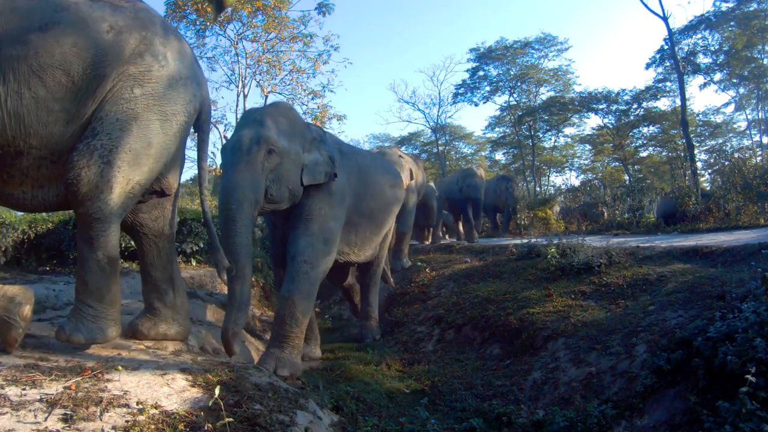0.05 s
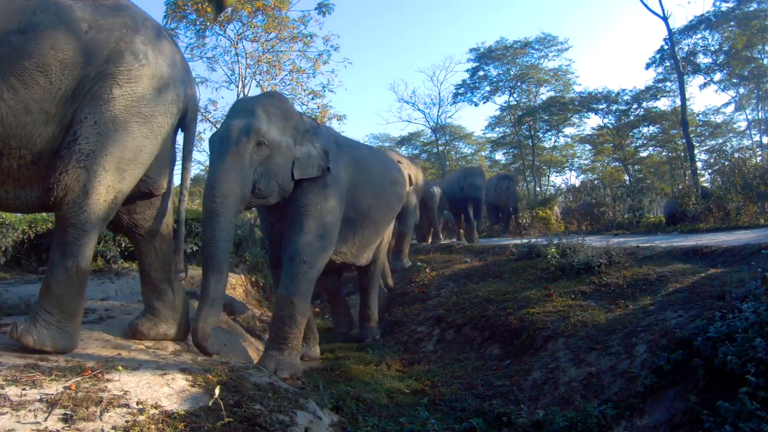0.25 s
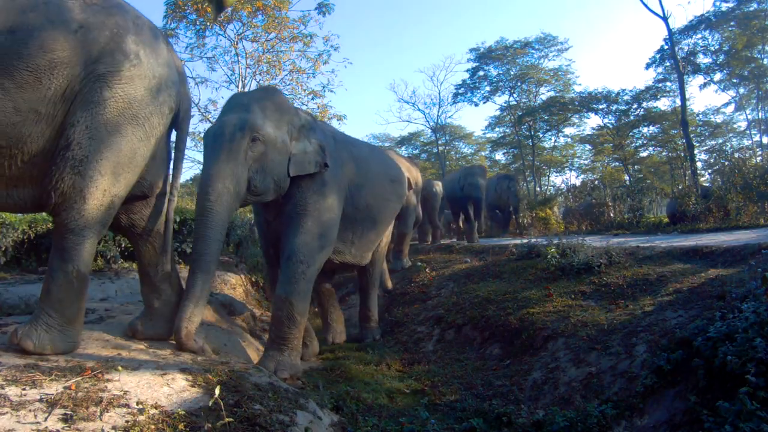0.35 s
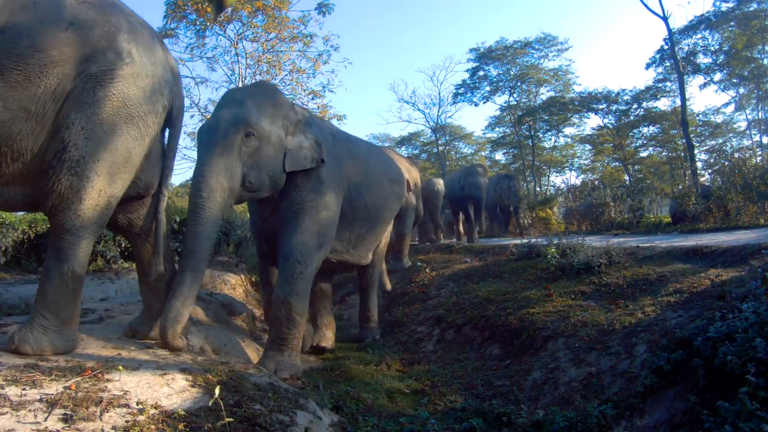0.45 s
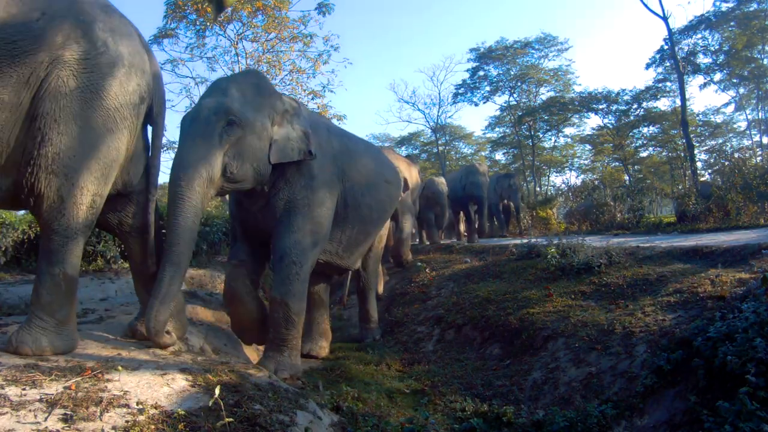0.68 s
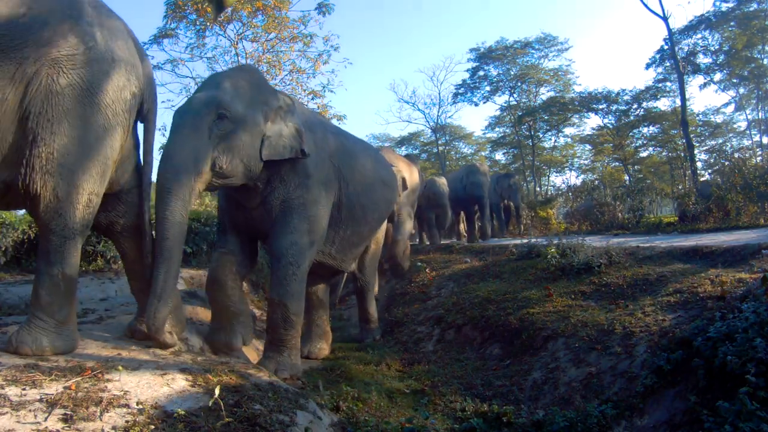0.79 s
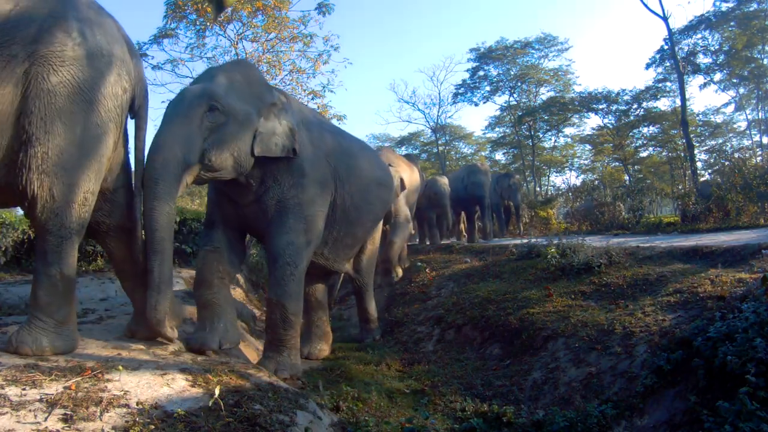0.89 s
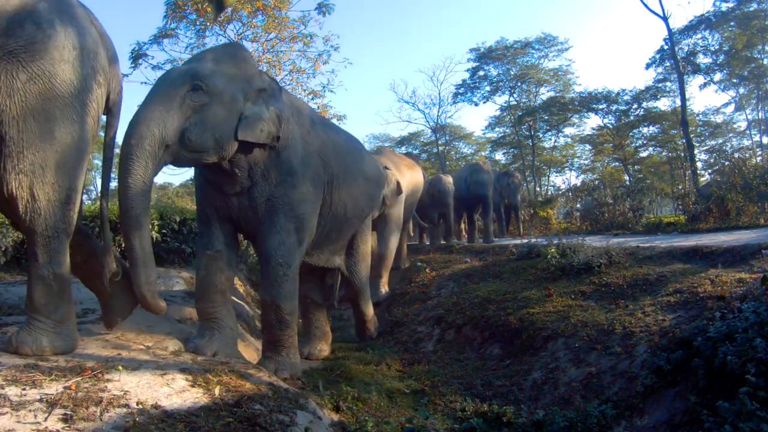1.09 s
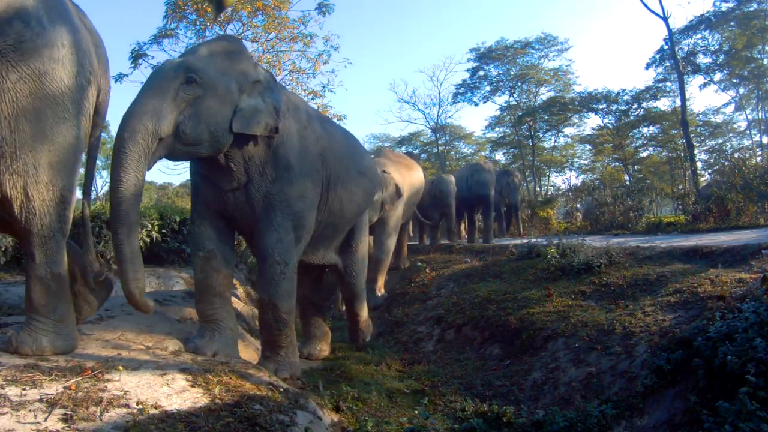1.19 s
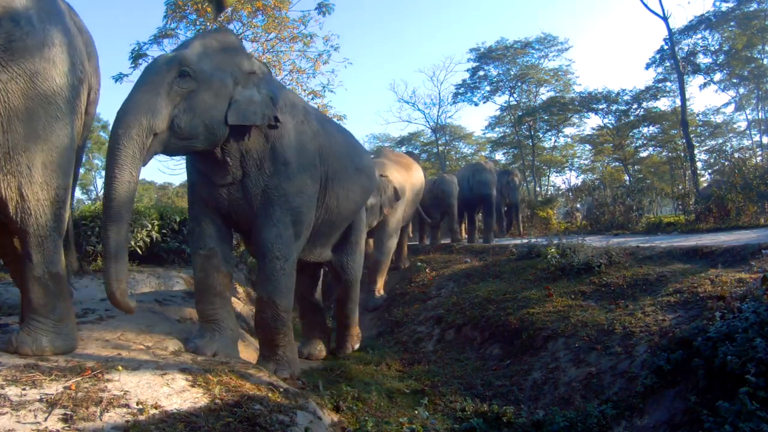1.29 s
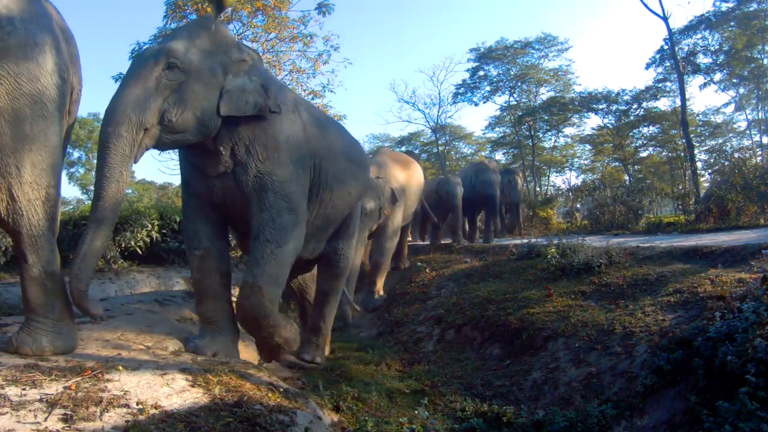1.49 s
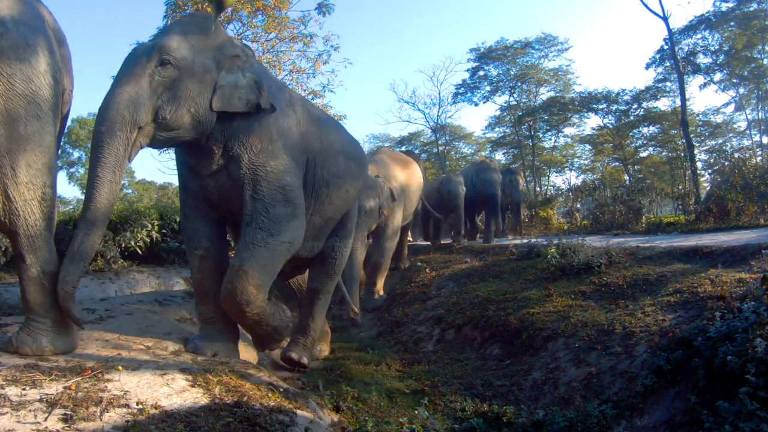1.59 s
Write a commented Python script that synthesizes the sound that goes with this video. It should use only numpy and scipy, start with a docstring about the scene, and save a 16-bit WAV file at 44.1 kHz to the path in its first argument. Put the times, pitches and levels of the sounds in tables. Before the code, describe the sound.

One brief, raspy elephant roar outdoors, followed by soft footsteps over a light rustle.

```python
"""Outdoors, a scuff and a soft footfall lead into one short, rough elephant roar, close by.
Its slow vocal folds drop to some 50 flaps a second and chop a turbulent rasp over a chest rumble.
A higher hoot breaks through in the middle and again at the end, where the folds catch in hard flaps.
Afterwards the herd shuffles over dry ground, a faint short hoot follows and a twig snaps.
A steady bed of rustle lies under it all."""
import sys
import numpy as np
from scipy import signal
from scipy.fft import rfft, irfft
from scipy.io import wavfile

SR = 44100
rng = np.random.default_rng(int(sys.argv[2]) if len(sys.argv) > 2 else 0)


def pcm_store(signal):
    """Save signal as 16-bit PCM."""
    levels = np.round(np.clip(np.atleast_2d(signal), -1, 1) * 32767)
    wavfile.write(sys.argv[1], SR, levels.astype(np.int16).T)


N = 72765
T = np.arange(N) / SR
FLUTTER_HZ = 59.1  # how fast the roar's pitch and level waver

# flap rate of the vocal folds: t/s, f/Hz
FOLD_RATE = [(0.15, 165.5), (0.2, 79.32), (0.28, 59.44), (0.35, 49.33), (0.45, 39.27), (0.56, 40.64),
             (0.64, 51.77), (0.72, 43.47), (0.84, 36.5)]
def roar(jitter=0.008):
    """The lead sound: slow folds pulse chest, rasp, hiss and hoot; flaps and rings sit on top."""
    voiced = T > FOLD_RATE[0][0]
    turns = np.cumsum(curve(FOLD_RATE) * (1 + jitter * wander(FLUTTER_HZ)) * voiced) / SR
    return chest(turns, voiced) + rasp(turns) + hiss(turns) + hard_flaps() + rings() + hoot(turns)


# envelope of the chest tone: t/s, level/dB
CHEST_LEVEL = [(.15, -67), (.172, -51), (.215, -42), (.28, -33.5), (.335, -31.5), (.38, -39.5), (.46, -42),
               (.65, -41), (.71, -52), (.76, -64), (.81, -76)]
# its harmonics, fundamental first: level/dB
CHEST_HARMONICS = [-5, 0.5, -15]
def chest(turns, voiced, shimmer_db=1):
    """The low end: a clean tone from the folds' first three harmonics."""
    tone = -sum(amp(db + shimmer_db * wander(FLUTTER_HZ)) * np.cos(2 * np.pi * k * turns)
                for k, db in enumerate(CHEST_HARMONICS, 1))
    return level(CHEST_LEVEL) * unit(tone * voiced)


# formants of throat, opening throat, mouth and bright edge: f/Hz, width/Hz, level/dB
THROAT_FORMANTS = [(159, 128, -3.5), (258, 160, -1.5), (373.4, 141, -1)]
OPENING_FORMANTS = [(460, 140, -1.5), (640, 237, 1)]
MOUTH_FORMANTS = [(686, 280, -12), (876, 220, 5), (1109, 260, 1)]
EDGE_FORMANTS = [(1583, 248, 1.5), (1904, 157, -4.5), (2292, 354, 1.5), (2894, 440, -11)]
# envelopes of the same four bands: t/s, level/dB
THROAT_LEVEL = [(.135, -77), (.165, -42), (.225, -31), (.335, -28), (.43, -32.5), (.51, -30.5),
                (.573, -37.5), (.61, -37.5), (.725, -36), (.76, -49.5), (.83, -76)]
OPENING_LEVEL = [(.155, -59), (.2, -39.5), (.3, -34), (.39, -37), (.43, -38.5), (.51, -37.5), (.6, -47)]
MOUTH_LEVEL = [(.16, -73), (.21, -53), (.26, -36), (.37, -31), (.42, -34), (.55, -37), (.65, -46.5),
               (.69, -51), (.735, -42.5), (.765, -49), (.82, -68)]
EDGE_LEVEL = [(.18, -56), (.235, -38), (.35, -37), (.405, -38), (.425, -42.5), (.5, -37), (.61, -41.5),
              (.7, -56), (.76, -57)]
def rasp(turns):
    """The body of the roar: chopped air resonates in throat and mouth."""
    throat_flow = airflow(turns, slap_db=-5, noise_db=-10)
    rough_flow = airflow(turns, slap_db=-1, noise_db=-7)
    throat = level(THROAT_LEVEL) * steady(tract(throat_flow, THROAT_FORMANTS), 0.05)
    opening = level(OPENING_LEVEL) * steady(tract(rough_flow, OPENING_FORMANTS), 0.04)
    mouth = level(MOUTH_LEVEL) * steady(tract(rough_flow, MOUTH_FORMANTS), 0.055)
    edge = level(EDGE_LEVEL) * steady(tract(rough_flow, EDGE_FORMANTS), 0.031)
    return throat + opening + mouth + edge


def airflow(turns, slap_db, noise_db, slaps_per_s=420, puff_cycles=0.96, leak=0.98, shimmer_db=2):
    """One rattling closure per cycle, with a puff of turbulence and irregular soft-tissue slaps."""
    closures = np.diff(np.floor(turns), prepend=np.floor(turns[0])) * amp(shimmer_db * noise())
    tissue_tail = noise() * burst(0, rise=0.0025, decay=0.012)  # the same after each closure
    rattle = signal.fftconvolve(closures, tissue_tail)[:N]
    puffs = leak + np.exp(-(turns % 1) / puff_cycles)  # air also leaks between puffs
    slaps = (rng.random(N) < slaps_per_s / SR) * amp(np.minimum(rng.exponential(1, N), 2))
    return unit(rattle) + amp(slap_db) * unit(slaps) + amp(noise_db) * unit(puffs * noise())


def tract(flow, formants):
    """The vocal tract as parallel resonances of alternating polarity."""
    return unit(sum((-1) ** k * amp(db) * band(flow, hz, width)
                    for k, (hz, width, db) in enumerate(formants)))


# pitch line of the hoot: t/s, f/Hz
HOOT_PITCH = [(.33, 344), (.36, 321), (.405, 316.5), (.47, 247.5), (.55, 248.5), (.6, 290.5), (.655, 284),
              (.674, 386), (.715, 381), (.76, 350.5), (.82, 348)]
# its envelope: t/s, level/dB
HOOT_LEVEL = [(.328, -42), (.353, -19), (.402, -21.5), (.418, -46), (.5, -33), (.55, -29.5), (.573, -49),
              (.601, -29), (.645, -31.5), (.66, -35), (.71, -31.5), (.78, -40.5), (.83, -59)]
def hoot(turns, wobble=0.0175, chop=0.28, harmonics_db=(0, -17, -18)):
    """A second, faster oscillator cuts through the roar, shaken by the slow folds."""
    hz = curve(HOOT_PITCH) * (1 + wobble * wander(FLUTTER_HZ))
    phase = 2 * np.pi * np.cumsum(hz) / SR
    tone = sum(amp(db) * np.sin(k * phase) for k, db in enumerate(harmonics_db, 1))
    return level(HOOT_LEVEL) * unit(tone * (1 + chop * np.cos(2 * np.pi * turns)))


# hits of the folds: t/s, throat level/dB, mouth level/dB, edge level/dB
FLAP_HITS = [(.600, -28.5, -53, -52), (.619, -36.5, -32, -29.5), (0.637, -30, -45, -40),
             (.659, -38, -35, -44.5), (.680, -29.5, -33, -47), (.701, -30, -34.5, -55)]
# formants of their bright edge: f/Hz, width/Hz, level/dB
FLAP_EDGE = [(1688, 180, -0.52), (2360, 240, -1.8)]
def hard_flaps(throat=(258, 142, 0), mouth=(915, 300, 0)):
    """Single hard flaps as the roar slows, each a puff into throat, mouth and bright edge."""
    layers = [sum(amp(db) * steady(band(noise(), hz, width), 0.012) for hz, width, db in formants)
              for formants in ([throat], [mouth], FLAP_EDGE)]
    return sum(amp(db) * burst(start, rise=0.0037, decay=0.0043, hold=0.005) * layer
               for start, *levels in FLAP_HITS for db, layer in zip(levels, layers))


# resonances that sing out in the roar: t/s, length/s, start f/Hz, end f/Hz, level/dB
RING_CUES = [(.285, .15, 168, 174, -30.5), (.225, 0.14, 1860, 1890, -41), (.33, 0.136, 800, 925, -39.5),
             (.54, 0.127, 1085, 1055, -38), (.34, 0.11, 578, 570, -42), (.22, 0.111, 358, 380, -34.5),
             (0.657, .1, 1030, 1030, -42.5), (.66, .085, 792, 792, -40), (.66, 0.078, 885, 885, -39),
             (0.651, 0.089, 1630, 1630, -49.5), (0.326, 0.096, 2380, 2410, -42.5)]
def rings(fuzz_hz=21.4):
    """Narrow, fuzzy resonances swell, glide and fade."""
    out = np.zeros(N)
    for start, length, hz_from, hz_to, db in RING_CUES:
        progress = np.clip((T - start) / length, 0, 1)
        phase = 2 * np.pi * np.cumsum(hz_from + (hz_to - hz_from) * progress) / SR
        fuzz = wander(fuzz_hz) * np.cos(phase) + wander(fuzz_hz) * np.sin(phase)
        swell = np.sqrt(4 * progress * (1 - progress))
        out += amp(db) * swell * steady(fuzz, 0.045)
    return out


# envelope of the breath: t/s, level/dB
HISS_LEVEL = [(.16, -65.5), (.205, -50.5), (.345, -43.5), (.43, -49), (.59, -47.5), (.67, -54), (.83, -60),
              (.87, -62)]
# its EQ: f/Hz, level/dB
HISS_EQ = [(1500, -40), (3200, -8.5), (4100, 4), (4900, -8), (6000, -5.5), (9000, -10), (11000, -19.5),
           (15500, -20.5)]
def hiss(turns, chop=0.15, flicker_db=1, climax_s=0.344):
    """Air rushes from the mouth, lightly pumped by the folds, with a bright spurt at the climax."""
    air = noise() * (1 + chop * np.sin(2 * np.pi * turns)) * amp(flicker_db * wander(230))
    spurt = unit(band(noise(), hz=5560, width=1500)) * np.exp(-((T - climax_s) / 0.044) ** 2)
    return level(HISS_LEVEL) * colour(air, HISS_EQ) + amp(-49.5) * spurt


def faint_hoot(start=1.12, pitch_hz=271.3, scoop=0.1525, scoop_s=0.026, fade_s=0.11):
    """A soft, short call scoops up to its pitch and fades."""
    age = np.maximum(T - start, 0)
    hz = pitch_hz * (1 - scoop * np.exp(-(age / scoop_s) ** 2) + 0.018 * wander(39))
    envelope = np.minimum(age / 0.012, 1) * np.exp(-(age / fade_s) ** 2)
    return amp(-46.5) * envelope * unit(np.sin(2 * np.pi * np.cumsum(hz) / SR))


# soft steps: t/s, level/dB, f/Hz, decay/s
STEP_CUES = [(0.078, -40.5, 530, 0.0043), (.896, -47.5, 218, 0.0055), (.975, -54, 163, 0.021),
             (1.021, -48, 820, 0.0053), (1.04, -59, 200, 0.0075), (1.199, -49.5, 700, 0.019),
             (1.465, -55.5, 257, 0.028), (1.501, -53, 515, 0.018)]
def footfalls():
    """Padded feet land in dull thuds."""
    return sum(amp(db) * burst(start, 0.0047, decay) * steady(band(noise(), hz, 0.55 * hz), 0.027)
               for start, db, hz, decay in STEP_CUES)


# foot scrapes: t/s, level/dB, decay/s
SCUFF_CUES = [(0.0, -45, 0.024), (0.112, -49, 0.024), (1.42, -54.5, 0.1)]
# EQ of the grit: f/Hz, level/dB
GRIT_EQ = [(200, -40.5), (900, 4.5), (1500, -4), (2300, 1), (3000, -8), (4200, -8), (9000, -18),
           (15500, -36)]
def scuffs(grain_db=2):
    """Feet scrape dry ground in grainy bursts."""
    grit = colour(noise() * amp(grain_db * wander(410)), GRIT_EQ)
    return grit * sum(amp(db) * burst(start, 0.007, decay) for start, db, decay in SCUFF_CUES)


def twig_snap():
    """A twig breaks underfoot with one small, dry crack."""
    crack = steady(band(noise(), hz=2080, width=800), 0.01)
    return amp(-40.5) * burst(start=1.409, rise=0.0029, decay=0.0065) * crack


# EQ of the outdoor bed: f/Hz, level/dB
RUSTLE_EQ = [(15, -52), (25, -1), (79, -10), (148, -1.5), (227, -2.5), (313, -3), (410, -5), (582, -6),
             (631, -5.5), (804, -7.5), (1270, -9), (2170, -8.5), (3630, -17.5), (15500, -34.5)]
# its envelope: t/s, level/dB
RUSTLE_LEVEL = [(0, -49.5), (.08, -51), (.8, -50), (1.0, -49.5), (1.22, -50), (1.35, -51), (1.52, -49.5),
                (1.65, -55)]
def rustle(flicker_db=0.7):
    """The background bed: rustle of the herd and the forest edge."""
    return level(RUSTLE_LEVEL) * colour(noise() * amp(flicker_db * wander(66)), RUSTLE_EQ)


def noise():
    """White noise."""
    return rng.standard_normal(N)


def amp(db):
    """Decibels to gain."""
    return 10 ** (np.asarray(db) / 20)


def unit(x):
    """Scales to rms 1."""
    return x / np.sqrt(np.mean(x ** 2) + 1e-20)


def curve(points):
    """Joins (t/s, value) breakpoints with straight lines."""
    return np.interp(T, *np.transpose(points))


def level(points, fade_db_per_s=500):
    """Gain from a dB envelope that dies away beyond its ends."""
    outside = np.maximum(points[0][0] - T, 0) + np.maximum(T - points[-1][0], 0)
    return amp(curve(points) - fade_db_per_s * outside)


def burst(start, rise, decay, hold=0):
    """Quick attack, optional hold and exponential decay, all in seconds."""
    return np.clip((T - start) / rise, 0, 1) * np.exp(-np.maximum(T - start - rise - hold, 0) / decay)


def colour(x, eq):
    """Applies an EQ curve and scales to rms 1."""
    hz, db = np.transpose(eq)
    f = np.fft.rfftfreq(N, 1 / SR)
    gain = amp(np.interp(np.log(f + 1), np.log(hz), db))
    return unit(irfft(rfft(x) * gain, N))


def wander(hz):
    """Smooth random drift up to a rate."""
    f = np.fft.rfftfreq(N, 1 / SR)
    return unit(irfft(rfft(noise()) * np.exp(-(f / hz) ** 2), N))


def band(x, hz, width):
    """A resonance with steep skirts."""
    middle = np.sqrt(hz ** 2 + width ** 2 / 4)
    edges = [middle - width / 2, middle + width / 2]
    return signal.sosfilt(signal.bessel(3, edges, "band", norm="mag", fs=SR, output="sos"), x)


def steady(x, seconds):
    """A leveller: evens out swings slower than the given time."""
    power = signal.fftconvolve(x ** 2, np.hanning(int(seconds * SR)), "same") / (seconds * SR / 2)
    return x / np.sqrt(abs(power) + 1e-6)


def scene():
    """The mono mix, from lead to bed."""
    return (roar() + faint_hoot() + footfalls() + scuffs() + twig_snap() + rustle())[None]


def record(dry, low_cut_hz=30, high_cut_hz=15600):
    """The microphone's bass roll-off and the band limit."""
    thin = signal.sosfilt(signal.butter(4, low_cut_hz, "high", fs=SR, output="sos"), dry)
    lowpass = signal.firwin(511, high_cut_hz, window=("kaiser", 9), fs=SR)
    return signal.oaconvolve(thin, lowpass[None], "same")


dry = scene()
out = record(dry)
pcm_store(out)
```